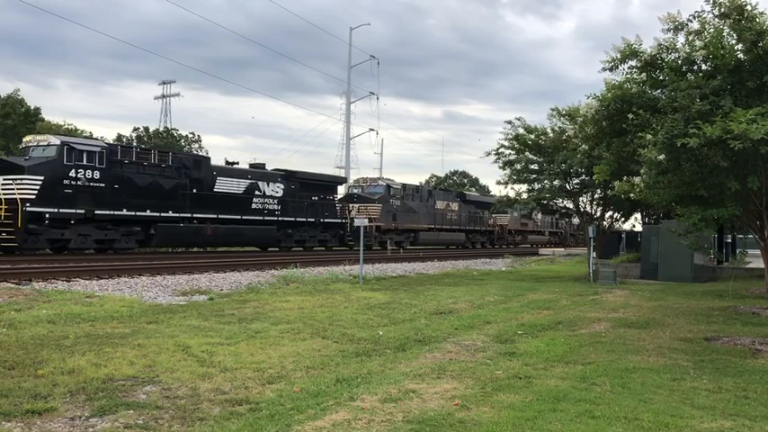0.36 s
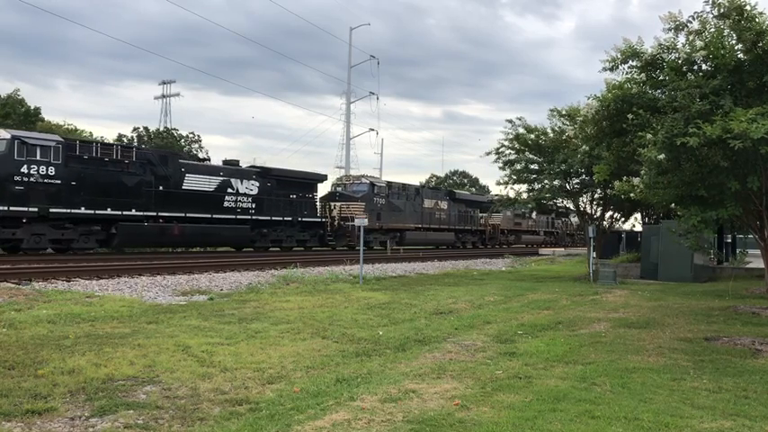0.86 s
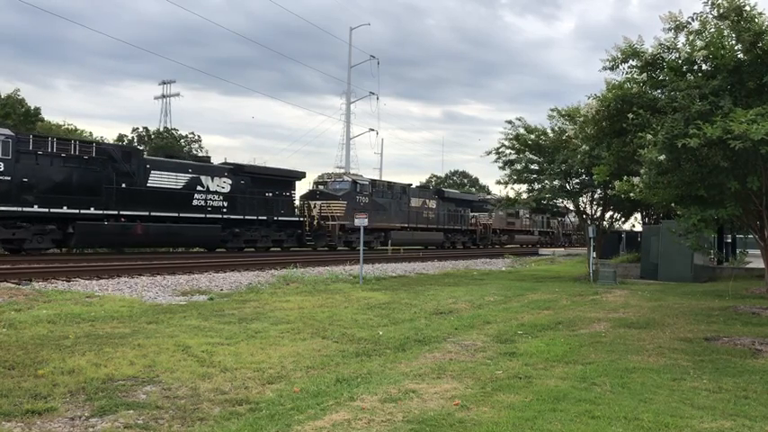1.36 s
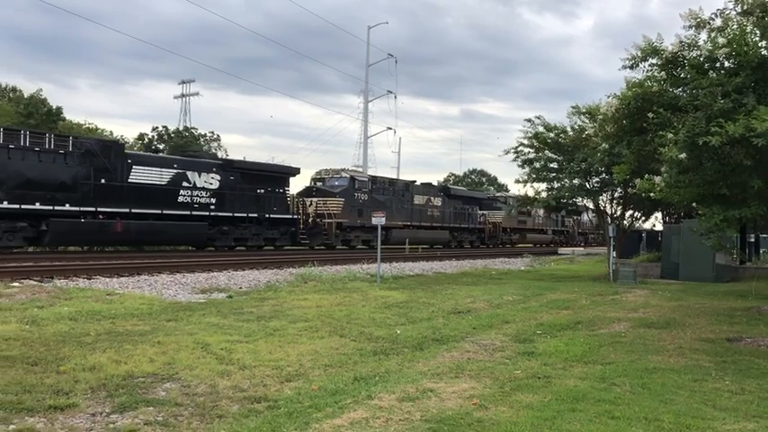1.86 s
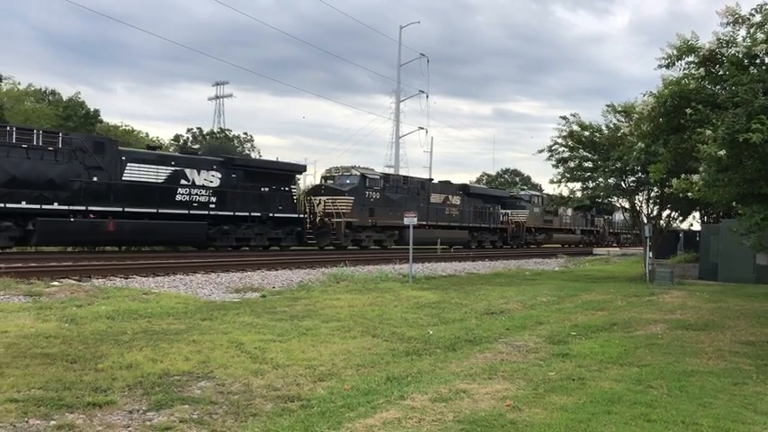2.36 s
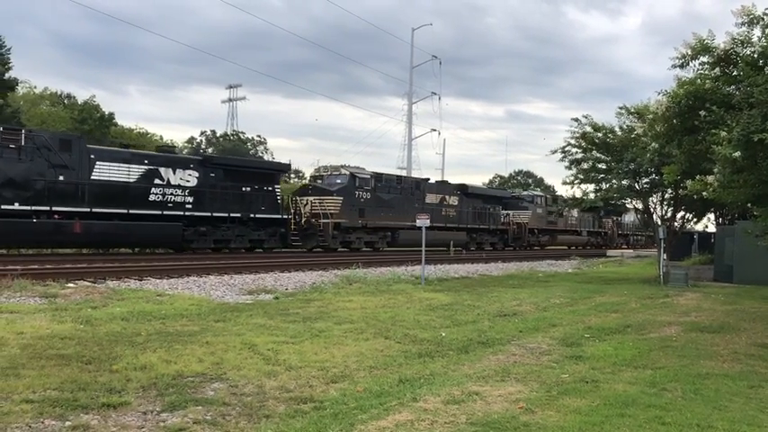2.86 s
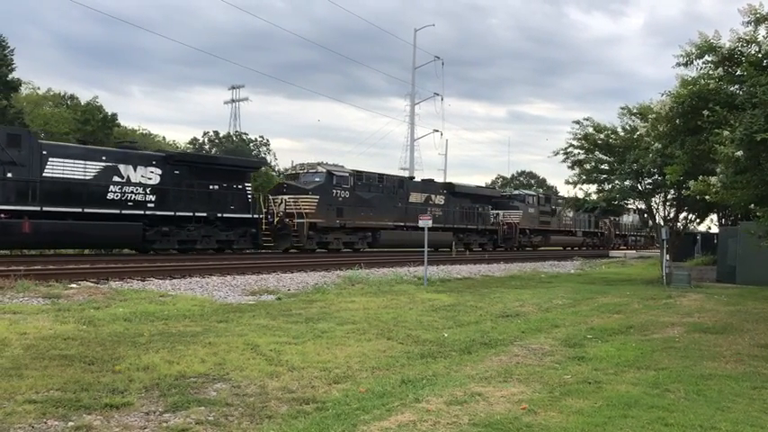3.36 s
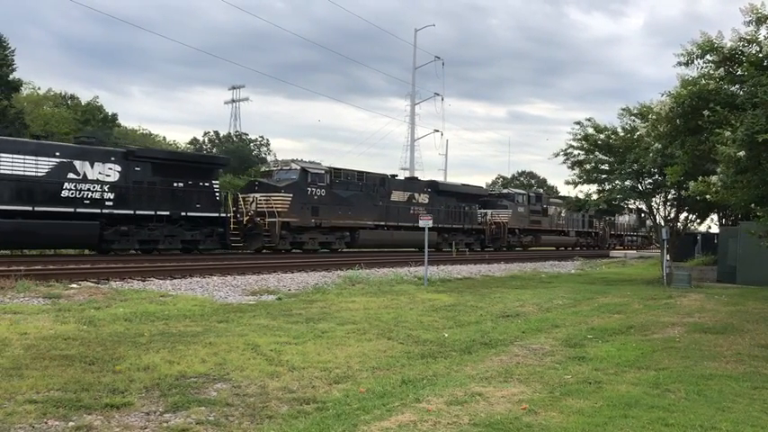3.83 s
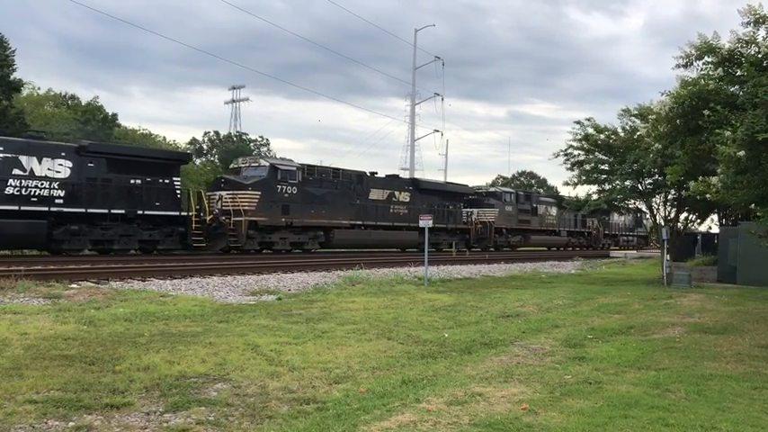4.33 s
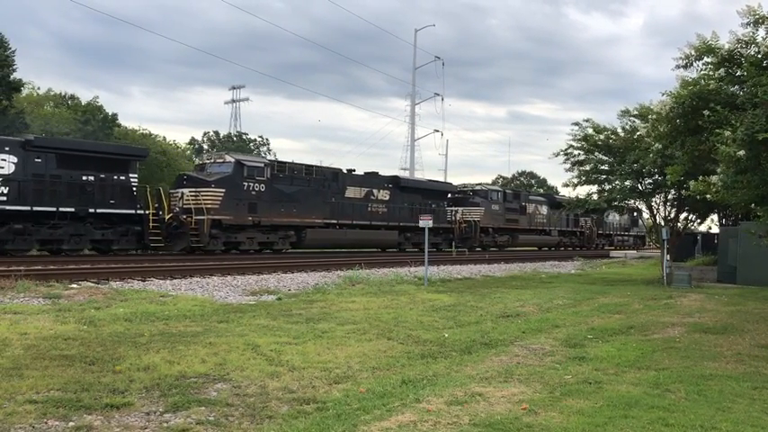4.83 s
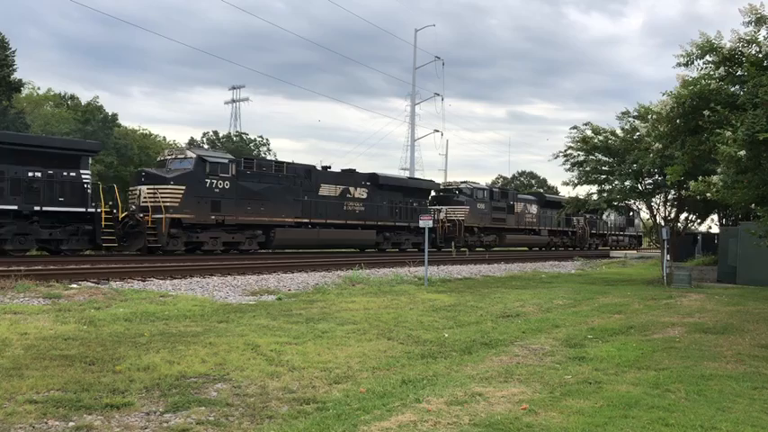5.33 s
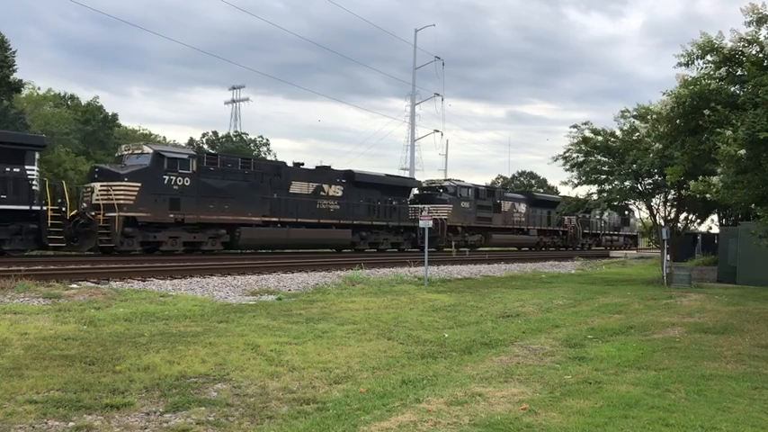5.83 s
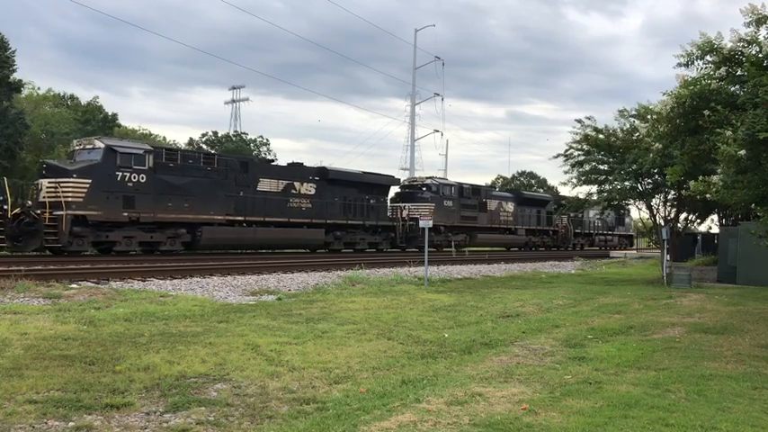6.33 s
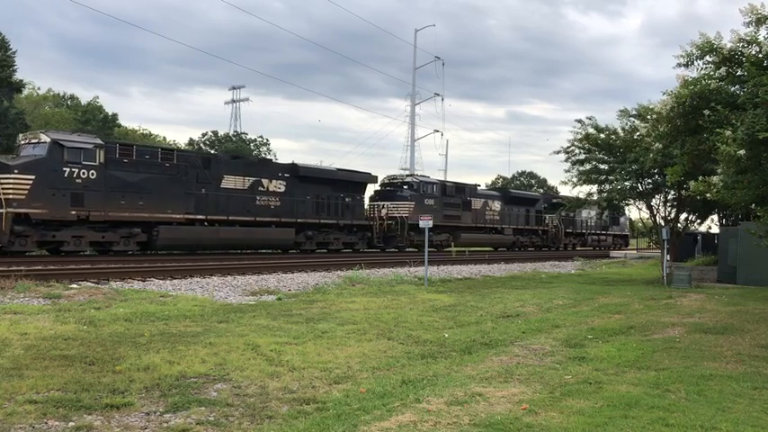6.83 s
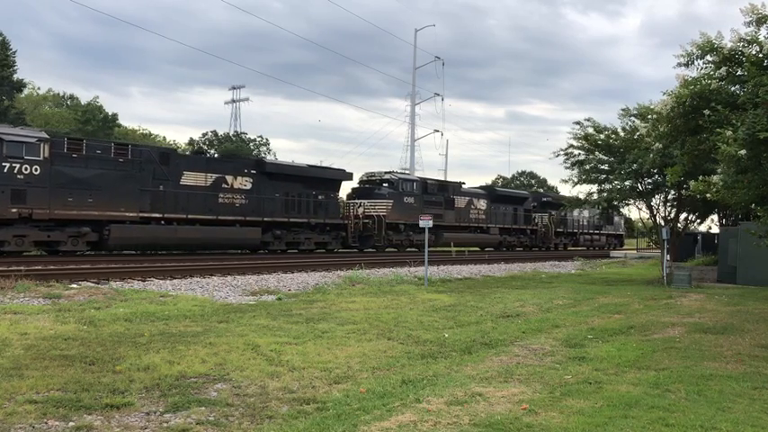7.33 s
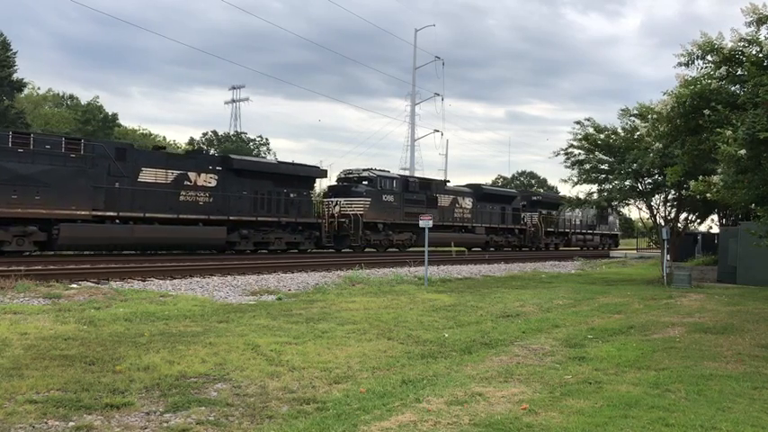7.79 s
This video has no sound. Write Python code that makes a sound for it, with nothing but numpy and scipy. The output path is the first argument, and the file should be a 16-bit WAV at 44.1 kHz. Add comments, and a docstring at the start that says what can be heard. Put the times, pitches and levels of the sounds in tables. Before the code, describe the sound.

Outdoors beside a railway, a very loud brassy horn chord sags and stops within the first second, echoing dully. A bright metal bell keeps striking about every three quarters of a second while diesel engines throb unevenly, gradually revving up over a low rumble and fan and wheel roar. Near the end compressed air hisses and the horn sounds again, duller.

```python
"""An open trackside lawn, with diesel locomotives rolling slowly past while the engine speeds up.
A five-chime air horn, built from wavering harmonics, ends one blast and starts the next.
An air-driven bell strikes steadily: each stroke rings a set of fading tones.
Uneven exhaust puffs ring the stack, and a second engine chugs, under a noise roar of fans and wheels.
Coupling clanks and escaping air add short bursts of noise; horn and bell echo in the yard."""
import sys
import numpy as np
from scipy import signal
from scipy.io import wavfile
from scipy.ndimage import uniform_filter1d

SR = 44100
rng = np.random.default_rng(int(sys.argv[2]) if len(sys.argv) > 2 else 0)


def dump(signal):
    """Clip the signal to [-1, 1] and save it as 16-bit WAV at the path in sys.argv[1]."""
    limited = np.clip(np.atleast_2d(signal).T, -1, 1)
    pcm = np.round(limited * 32767).astype(np.int16)
    wavfile.write(sys.argv[1], SR, pcm)


def ratio_of_db(decibels):
    """Turn decibels (scalar or array-like) into linear amplitude factors; 0 dB maps to 1."""
    return 10 ** (np.asarray(decibels, float) / 20)


N = 349713

# bell strokes, each reaching the listener by other paths; levels of four groups of bell modes:
# (time [s], hum level [dB], second mode level [dB], strike tone level [dB], upper modes level [dB])
STROKE_LEVELS = [(.16, -49, -46.5, -45, -47.5), (.8994, -44, -45, -45, -43), (1.6267, -43, -39.5, -42, -39),
                 (2.3775, -48.5, -33, -37.5, -34.5), (3.1248, -38, -38, -32, -32.5),
                 (3.8834, -36.5, -35, -38.5, -33), (4.6394, -33, -36, -29.5, -34),
                 (5.3946, -36.5, -45.5, -33, -35), (6.1449, -32.5, -41, -36.5, -35.5),
                 (6.8897, -52, -39, -32, -36.5), (7.644, -45, -42.5, -35.5, -36)]


def rms_one(x):
    """Scale a signal to an rms of 1."""
    return x / np.sqrt(np.mean(x ** 2) + 1e-20)


def in_time(rows):
    """Columns of a table, joined by straight lines at every sample."""
    times, *columns = np.transpose(rows)
    return [np.interp(np.arange(N) / SR, times, column) for column in columns]


def drift(rate_hz):
    """Slow random wandering of spread 1: noise smoothed by two equal low-pass stages."""
    # worked out at every 40th sample, then joined by straight lines
    pole = np.exp(-80 * np.pi * rate_hz / SR)
    white = rng.standard_normal(N // 40 + 2002)
    slow = signal.lfilter([1], [1, -2 * pole, pole * pole], white)[2000:]   # skip the settling
    return np.interp(np.arange(N) / 40, np.arange(len(slow)), rms_one(slow - slow.mean()))


def resonance(x, hz, width_hz):
    """Band-pass like one ringing resonance, with a gain of 1 at its peak."""
    w, b = 2 * np.pi * hz, 2 * np.pi * width_hz
    return signal.lfilter(*signal.bilinear([b, 0], [1, b, w * w], SR), x + 1e-18)


def noise(spectrum, patchy_db):
    """Roughly third-octave bands of noise, each flickering on its own; rms 1."""
    hz, db = np.transpose(spectrum)
    edges = np.geomspace(hz[0], hz[-1], int(3 * np.log2(hz[-1] / hz[0])) + 2)
    white = rng.standard_normal((2, N))   # neighbouring bands take turns
    out = 0
    for k, (low, high) in enumerate(zip(edges, edges[1:])):
        band_pass = signal.butter(2, [low, high], "band", fs=SR, output="sos")
        band = signal.sosfilt(band_pass, white[k % 2])
        middle_db = np.interp(np.log(low * high) / 2, np.log(hz), db)
        out = out + band * ratio_of_db(middle_db + patchy_db * drift(6.))
    return rms_one(out)


def struck(events, db, t60):
    """Envelope that jumps at each event and falls by 60 dB in t60 seconds."""
    clicks = np.zeros(N)
    clicks[(np.array(events)[:, 0] * SR).astype(int)] = ratio_of_db(db)
    return signal.lfilter([1], [1, -ratio_of_db(-60 / (t60 * SR))], clicks + 1e-18)


def chime(hz, first, second, overtones, slope_db=-2.5, waver_db=1.78, breath_db=-30, soft_dulling=.32):
    """A beating diaphragm: harmonics that waver apart on the way, with air noise on each beat."""
    # the valve eases off, then shuts; later it opens again
    ease_s, ease_db_per_s, shut_s, shut_db_per_s = .69, -58, .86, -300
    open_s, attack_s, settle_s = 7.785, 0.021, 0.17
    flat_per_s = 5.0   # an early chime, on low pressure, starts flat: share of pitch per s of lead
    sag_per_db = .0003   # share of pitch lost per dB as the pressure falls
    away_from_hz, away_db_per_khz = 900, -12   # the second blast is duller above this pitch
    first_db, swell_db_per_s, shut_late_s = first
    second_db, late_s, away_db = second
    shut_s = shut_s + shut_late_s
    open_s = open_s + late_s

    t = np.arange(N) / SR
    on = np.flatnonzero((t < shut_s - shut_late_s + .3) | (t > open_s))   # skip the silence between
    t = t[on]
    again = on > N // 2   # true in the second blast
    since = np.maximum(t - open_s, 1e-5)

    fall_db = ease_db_per_s * np.clip(t - ease_s, 0, shut_s - ease_s)
    fall_db = fall_db + shut_db_per_s * np.maximum(t - shut_s, 0)
    attack_db = 40 * np.log10(np.minimum(since / attack_s, 1))
    sag_db = np.where(again, attack_db, fall_db)
    level_db = sag_db + np.where(again, second_db, first_db + swell_db_per_s * t)

    start_bend = flat_per_s * min(late_s, 0) * np.exp(-since / settle_s)
    pitch = hz * (1 + np.where(again, start_bend, sag_per_db * fall_db))
    phase = 2 * np.pi * np.cumsum(pitch * (1 + 0.0008 * drift(25.)[on])) / SR

    harmonics_db = [0, *overtones, *(overtones[-1] + slope_db * np.arange(1, 15))]
    wavers = [drift(4.)[on] for _ in range(4)]
    # overtones fade first as the air pressure falls, and the second blast points away
    dull_db = soft_dulling * np.maximum(sag_db, -30) + away_db * again
    tone = 0
    for k, harmonic_db in enumerate(harmonics_db):
        above_khz = np.clip((k + 1) * pitch - away_from_hz, 0, 2500) / 1000
        loss_db = min(k, 5) * dull_db + again * away_db_per_khz * above_khz
        strength = ratio_of_db(harmonic_db + loss_db + waver_db * wavers[k % 4])
        # high overtones stay in step: a steep brassy front
        start = rng.uniform(0, 2 * np.pi) * (k < 6)
        tone = tone + strength * np.sqrt(2) * np.sin((k + 1) * phase + start)

    hiss = rng.standard_normal(on.size)
    hiss = signal.sosfilt(signal.butter(1, [300., 1500.], "band", fs=SR, output="sos"), hiss)
    hiss = signal.sosfilt(signal.butter(2, 5500., fs=SR, output="sos"), hiss)
    breath = ratio_of_db(breath_db + dull_db) * rms_one(hiss) * (1 + np.cos(phase))
    out = np.zeros(N)
    out[on] = ratio_of_db(level_db) * (tone + breath)
    return out


def horn():
    """Five chimes in a chord; so loud that they mix in the air; a ground echo dips the treble."""
    # fundamental of each chime [Hz]
    chimes_hz = [317, 395.7, 430, 496, 618.6]
    # each chime in the first blast: (level [dB], swell [dB per s], shuts late [s])
    first_blast = [(-26.5, -0.5, .0), (-21.5, -2, -0.036), (-21.5, 1.5, .01), (-21, 3.5, .005),
                   (-27.5, -8, -.02)]
    # each chime in the second blast, pointing away:
    # (level [dB], speaks late [s], change per overtone [dB])
    second_blast = [(-25, .0, -7), (-19, .055, 0.6), (-15.5, .007, -6), (-15.5, .003, -2),
                    (-21.5, -.016, -10)]
    # harmonics 2 to 6 of each chime, against its fundamental: five levels [dB]; higher ones fall by a slope
    overtone_levels = [(9.5, 6, -8, -5.5, -17), (0.5, -13.5, -17, -30.5, -29),
                       (-2.5, -12, -14.5, -33, -33.5), (-15.5, -16, -30.5, -41, -45.5),
                       (-5, -10.5, -22.5, -35.5, -34.5)]
    mixing, dip_hz, dip_width_hz, dip_share = 0.018, 2275, 280, 0.55

    chord = sum(chime(*row) for row in zip(chimes_hz, first_blast, second_blast, overtone_levels))
    # squaring makes the sum and difference tones
    mixed = signal.sosfilt(signal.butter(2, 600., "high", fs=SR, output="sos"), chord ** 2 / 0.085)
    chord = chord + mixing * mixed
    return chord - dip_share * resonance(chord, dip_hz, dip_width_hz)


def bell():
    """Each stroke rings all modes; motion lowers the pitch from stroke to stroke."""
    # bell modes, many split in pairs: (pitch [Hz], level [dB], time to fall 60 dB [s])
    bell_modes = [(904, 1.5, 4.84), (1909, 3, 1.38), (1946, -10.5, .85), (2157, 4.5, 0.93), (2142, -7, .6),
                  (3220, -11.5, .6), (3750, -8.5, 1.12), (3756, -14, 0.98), (5284, -13.5, 0.48),
                  (5290, -16.5, .2), (5390, -14, 0.55), (5400, -14, .6), (5630, -15, 0.9),
                  (5450, -26, 0.78), (5780, -17, .33), (6880, -25.5, 0.65), (8000, -17.5, .57),
                  (8750, -28, 0.35), (9750, -28.5, 0.23), (10480, -28, .35), (11800, -40, .3),
                  (13110, -31, .4)]
    # borders between the four groups of modes [Hz]
    group_edges_hz = [1400, 2000, 2500]
    # pitch change by motion: (time [s], pitch ratio [1])
    doppler = [(0, 1.001), (2.4, 1), (4.6, .9962), (7.7, .9945)]
    opposed = 4   # this mode, the strike tone's twin, starts against its partner
    bloom_s, bloom_share = 0.012, 0.34
    scatter, scatter_hz_per_khz, scatter_full_hz = 0.55, 7.4, 4000

    hz, db, t60 = np.transpose(bell_modes)
    group = np.searchsorted(group_edges_hz, hz)
    t = np.arange(int(1.3 * SR))[:, None] / SR
    # a few cycles to start, then near echoes swell the ring
    dying = np.exp(-np.log(1000) * t / t60) * np.minimum(t * hz / 5., 1)
    dying = dying * (1 - bloom_share * np.exp(-t / bloom_s))
    # paths off the ground and the cars shift as the train moves: each mode flutters, high ones faster
    flutter = np.transpose([1 + scatter * min(f / scatter_full_hz, 1) * drift(scatter_hz_per_khz * f / 1000)
                            for f in hz])
    out = np.zeros(N)
    for s, *group_db in STROKE_LEVELS:
        chance_db = 2.7 * rng.standard_normal(hz.size) * (db < 0)   # only weaker modes vary
        level = ratio_of_db(np.array(group_db)[group] + db + chance_db)
        level[opposed] *= -1
        ratio = np.interp(s, *np.transpose(doppler))
        rings = np.sin(2 * np.pi * hz * ratio * t) * dying
        at = int(s * SR)
        out[at:at + len(t)] += (rings[:N - at] * flutter[at:at + len(t)]) @ level
    # a short noisy crack at each stroke
    crack_db = np.array(STROKE_LEVELS)[:, 4] + 0.5
    crack = rng.standard_normal(N) * struck(STROKE_LEVELS, crack_db, t60=.07)
    return out + resonance(resonance(crack, 2100, 2300), 2600, 6000)


def clapper():
    """The striker is drawn back against its stop: noise rattles the broad resonances of the bell mount."""
    # resonances of the bell mount: (pitch [Hz], width [Hz], gain [dB])
    mount_modes = [(2400, 490, 16), (7100, 600, -4), (9100, 1100, -7), (12200, 200, -6), (14100, 1400, -19)]
    lead_s, rattle_db = .241, -8   # time ahead of each stroke; level against the upper bell modes
    s, upper_db = np.array(STROKE_LEVELS)[:, [0, 4]].T
    at = s[1:] - lead_s
    level_db = np.interp(at, s, upper_db) + rattle_db + rng.normal(0, 1.5, at.size)
    rattle = rng.standard_normal(N) * struck(at[:, None], level_db, t60=0.16)
    return sum(ratio_of_db(db) * resonance(rattle, hz, width) for hz, width, db in mount_modes)


def exhaust(cycles, puff_db):
    """The puff pattern repeats every cycle, a little unevenly, and rings the stack."""
    # exhaust puffs of one cycle as they arrive: (share of the cycle [1], level [dB])
    puff_pattern = [(0.0674, -2.9), (0.148, -5.1), (0.2379, -7.8), (0.3028, -15.7), (0.3973, -11.1),
                    (0.4568, -10.5), (0.533, -12.9), (0.5707, -22.4), (0.7575, 0.0), (0.7863, -2.7),
                    (0.8852, -27.2), (0.9943, -3.6)]
    # exhaust stack resonances: (pitch [Hz], width [Hz], gain with sign [1])
    stack_modes = [(68.53, 11.02, .798), (92.89, 8.21, -.724), (53.66, 16.33, -.047)]
    share, db = np.transpose(puff_pattern)
    turn = np.arange(int(cycles[-1]) + 1)[:, None] + share
    at = np.searchsorted(cycles, turn.ravel())
    size = ratio_of_db(np.tile(db, len(turn)) + 0.56 * rng.standard_normal(at.size))
    puffs = np.bincount(at, size, N + 1)[:N] * SR * ratio_of_db(puff_db)
    rung = sum(gain * resonance(puffs, hz, width) for hz, width, gain in stack_modes)
    for _ in range(2):   # the stack mouth radiates little deep bass
        rung = signal.lfilter(*signal.butter(1, 45, "high", fs=SR), rung)
    rung = signal.lfilter(*signal.butter(2, 101, fs=SR), rung)
    # a weak knock of each puff passes the silencer higher up
    knock = signal.sosfilt(signal.butter(3, [110., 225.], "band", fs=SR, output="sos"), puffs)
    return rung + ratio_of_db(-40.5) * knock, puffs


def chug(cycles):
    """A dull thump each turn of the second engine (rms 1), and its smooth shape (up to 1)."""
    # two turns a cycle; it slips slowly behind the first engine
    slip_turns, slip_from_s, slip_s = 1.1, 1.3, 4.5
    sharpness = 2.0
    t = np.arange(N) / SR
    turns = 2 * cycles - slip_turns * (1 - np.exp(-(t - slip_from_s) / slip_s))
    beats = np.diff(np.floor(turns + .2), prepend=0) * ratio_of_db(2 * drift(8.))
    band_pass = signal.butter(4, [148., 224.], "band", fs=SR, output="sos")
    thumps = signal.sosfilt(band_pass, np.maximum(beats, 0) + 1e-18)
    return rms_one(thumps), np.exp(sharpness * (np.cos(2 * np.pi * turns) - 1))


def engine():
    """Exhaust, whines locked to the engine, a rumble that swells with each chug and a hiss that swells with the
    puffs."""
    # strength of the engine as heard, area of the strongest exhaust puff: (time [s], level [dB])
    engine_level = [(0, -47.5), (.8, -49.5), (2.4, -40.5), (4, -40.5), (4.8, -40), (6.3, -38.5),
                    (7.93, -39.5)]
    # whines locked to the engine, heard in spells: # (middle [s], length [s], multiple of the cycle rate [1],
    # level [dB])
    whine_spells = [(2.553, 0.77, 212, -52.5), (3.5, 0.85, 212, -48), (4.25, .55, 212, -42),
                    (5.3, .6, 212, -48), (6.7, .6, 212, -46), (3.388, 0.26, 179, -46),
                    (4.293, 0.49, 179, -45), (5.004, .3, 179, -41.5), (7.15, .3, 179, -54)]
    # colour of the low roar: (pitch [Hz], relative level [dB per Hz])
    roar_low = [(30, -33.5), (55, 0.5), (95, 5), (125, -6.5), (165, -1), (205, -4.5), (245, -31),
                (400, -23.5)]
    # colour of the high roar: (pitch [Hz], relative level [dB per Hz])
    roar_high = [(200, -20.5), (300, 2), (500, 0), (800, -1.5), (1300, -5.5), (1900, -11.5), (2500, -21),
                 (4000, -25.5), (6300, -37), (10000, -48.5), (15700, -56)]
    # four-stroke cycles per s: idle until the throttle opens, then a slow climb towards the governor's aim
    idle_per_s, throttle_s, aim_per_s, climb_s = 4.86221, .68143, 11.72992, 38.6057
    chug_db, chug_swell_db = -9.5, 3   # thump against the rumble; the rumble swells with it

    t = np.arange(N) / SR
    climb = np.exp(-np.maximum(t - throttle_s, 0) / climb_s)
    cycles = np.cumsum(aim_per_s - (aim_per_s - idle_per_s) * climb) / SR
    puff_db, = in_time(engine_level)
    stack, puffs = exhaust(cycles, puff_db)
    throb = signal.sosfilt(signal.butter(2, 30., fs=SR, output="sos"), puffs / ratio_of_db(puff_db))
    throb = rms_one(throb - throb.mean())

    # the roar follows the engine's strength and drifts in level as the train rolls by
    strength_db = puff_db - puff_db.mean()
    rumble_db = -26.5 + 1.7 * strength_db - 1.0 * t
    hiss_db = -41.5 + .34 * strength_db + 0.83 * t
    thumps, beat = chug(cycles)
    rumble = ratio_of_db(chug_swell_db * (beat - .5)) * noise(roar_low, patchy_db=1.5)
    low = ratio_of_db(rumble_db) * (rumble + ratio_of_db(chug_db) * thumps)
    high = ratio_of_db(hiss_db + 0.44 * throb) * noise(roar_high, patchy_db=1.32)

    whines = 0
    for middle, length, multiple, db in whine_spells:
        spell = np.exp(-(2 * (t - middle) / length) ** 4)
        whines = whines + ratio_of_db(db) * spell * np.sin(2 * np.pi * multiple * cycles)
    return stack + low + high + whines * ratio_of_db(2.1 * drift(6.0))


def air():
    """Compressed air escapes before the second blast: smooth bright hiss, and the ping of a valve."""
    # escapes of air: (start [s], rise [s], hold [s], level [dB], fall [dB per s])
    escapes = [(7.494, .006, .0, -49, -110), (7.644, 0.023, 0.14, -46.5, -100)]
    # colour of the hiss: (pitch [Hz], relative level [dB per Hz])
    air_colour = [(2470, -24), (4200, -1.5), (6820, -12), (9490, -12), (15700, -24)]
    # tones of the valve: (pitch [Hz], relative level [dB], time to fall 60 dB [s])
    ping_modes = [(6530, -8, .3), (7133, -1, .6), (11070, -7.5, .35), (11760, -6, .39), (12340, 5, .43),
                  (13600, -6, .3)]
    ping_s, ping_db = 7.496, -58   # the valve pings as the first puff escapes
    t = np.arange(N) / SR
    level = 0
    for start, rise, hold, db, fall_db in escapes:
        falling = np.maximum(t - start - rise - hold, 0)
        level = level + np.clip((t - start) / rise, 0, 1) * ratio_of_db(db + fall_db * falling)
    since = np.maximum(t - ping_s, 0)
    ping = sum(ratio_of_db(ping_db + db - 60 * since / t60) * np.sin(2 * np.pi * hz * since)
               for hz, db, t60 in ping_modes)
    return level * noise(air_colour, patchy_db=2.5) + ping


def clanks():
    """Brief dull knocks of steel: bursts of noise through two resonances at one pitch."""
    # small clanks from the couplings: (time [s], peak level [dB], pitch [Hz])
    coupling_clanks = [(1.2147, -40.5, 2270), (1.393, -50, 2250)]
    out = 0
    for clank in coupling_clanks:
        _, peak_db, hz = clank
        # 17 dB makes up for what the resonances take away
        knock = rng.standard_normal(N) * struck([clank], peak_db + 17, t60=0.046)
        out = out + resonance(resonance(knock, hz, 500), hz, 780)
    return out


def yard(x):
    """Dull scattered echoes from cars, sheds and trees, and single ones from far walls."""
    # far walls: (delay [s], level [dB])
    wall_echoes = [(.16, -24), (.33, -27), (.55, -29.5)]
    t60_s, cut_hz, tail_db = 1.48, 1000, -23
    t = np.arange(int(2.5 * SR)) / SR
    dull = signal.butter(1, cut_hz, fs=SR)
    tail = rng.standard_normal(t.size) * np.exp(-np.log(1000) * t / t60_s) * (t > .03)
    tail = signal.lfilter(*dull, tail)
    tail = ratio_of_db(tail_db) * tail / np.sqrt(np.sum(tail ** 2))
    delays = [int(s * SR) for s, _ in wall_echoes]
    walls = np.bincount(delays, [ratio_of_db(db) for _, db in wall_echoes], t.size)
    return signal.fftconvolve(x, tail + signal.lfilter(*dull, walls))[:N]


def scene():
    """Horn and bell echo in the yard; the rest is heard direct."""
    loud = horn() + bell()
    return (loud + yard(loud) + clapper() + clanks() + air() + engine())[None]


def top_cut(x):
    """Nothing passes above the cut-off."""
    return signal.sosfilt(signal.butter(12, 15820, fs=SR, output="sos"), x)


def record(dry, top=0.64, release_db_s=42.0, soft_top=1.3):
    """The microphone cuts deep bass and rounds loud peaks; a limiter holds the level; the fastest peaks clip."""
    no_bass = signal.sosfilt(signal.butter(2, 30., "high", fs=SR, output="sos"), dry)
    soft = soft_top * np.tanh(no_bass / soft_top)
    over_db = np.maximum(20 * np.log10(np.abs(soft[0]) / top + 1e-9), 0)
    # the limiter holds each peak, then lets go at a steady rate
    fall_db = release_db_s * np.arange(N) / SR
    held_db = np.maximum.accumulate(over_db + fall_db) - fall_db
    ahead = int(0.0016 * SR)   # it looks 1.6 ms ahead
    gain_db = -uniform_filter1d(np.r_[held_db[ahead:], held_db[-ahead:]], 2 * ahead)
    return top_cut(np.clip(soft * ratio_of_db(gain_db), -top, top))


dry = scene()
out = record(dry)
dump(out)
```